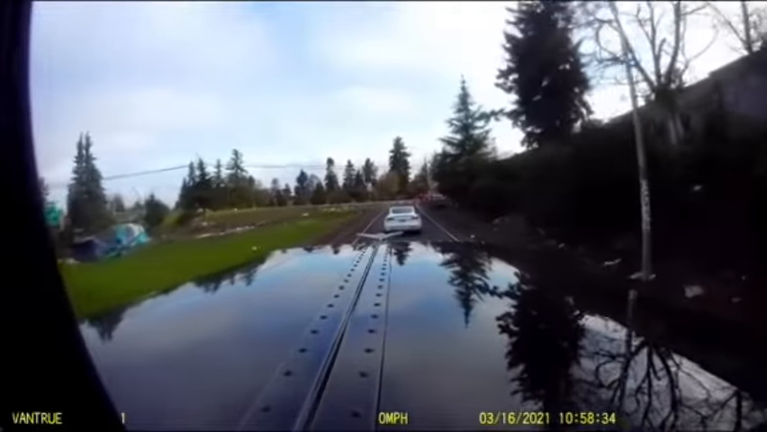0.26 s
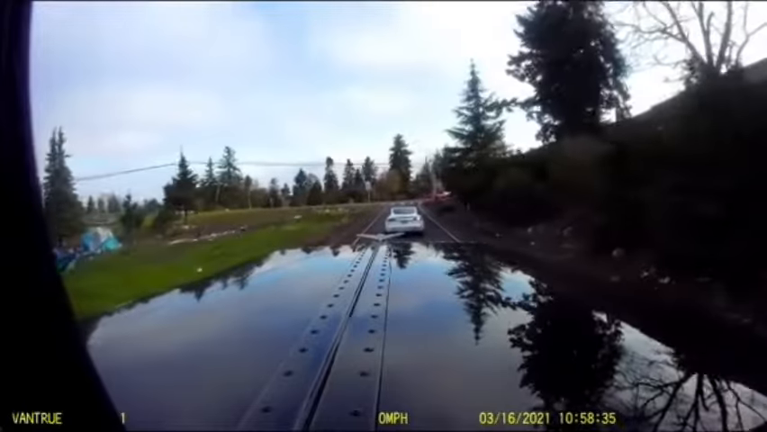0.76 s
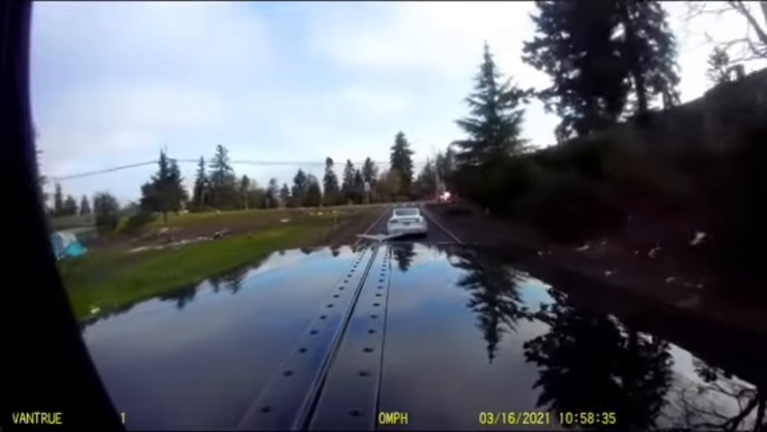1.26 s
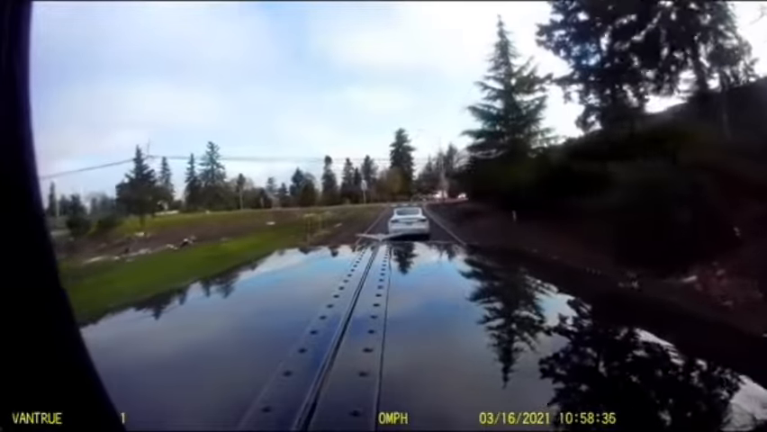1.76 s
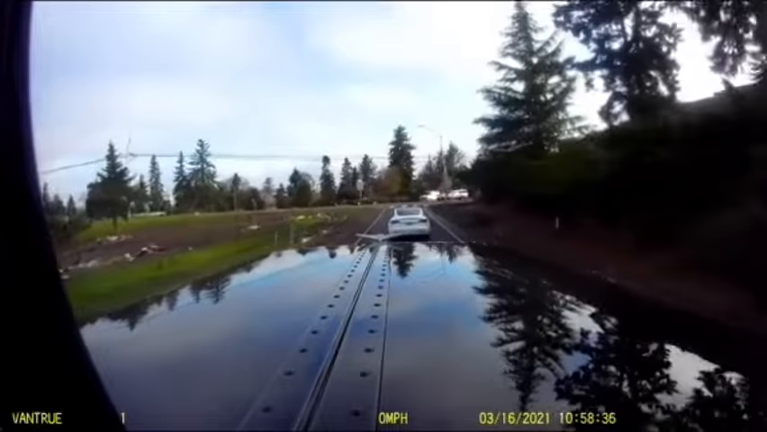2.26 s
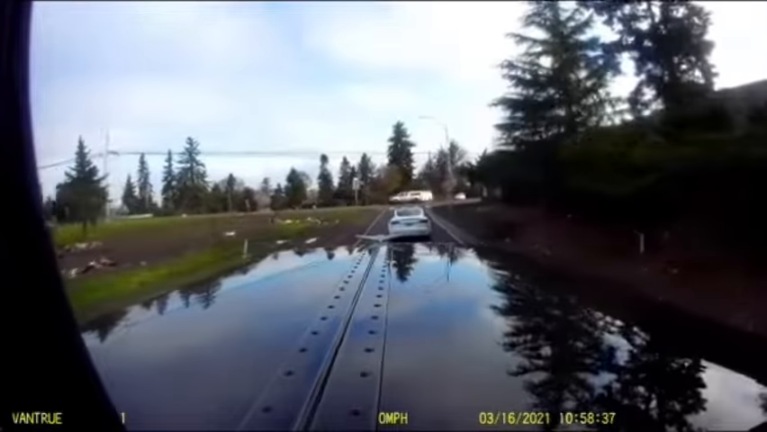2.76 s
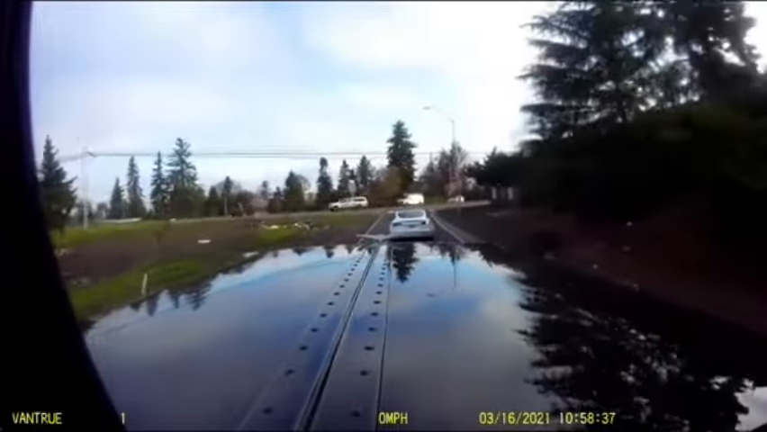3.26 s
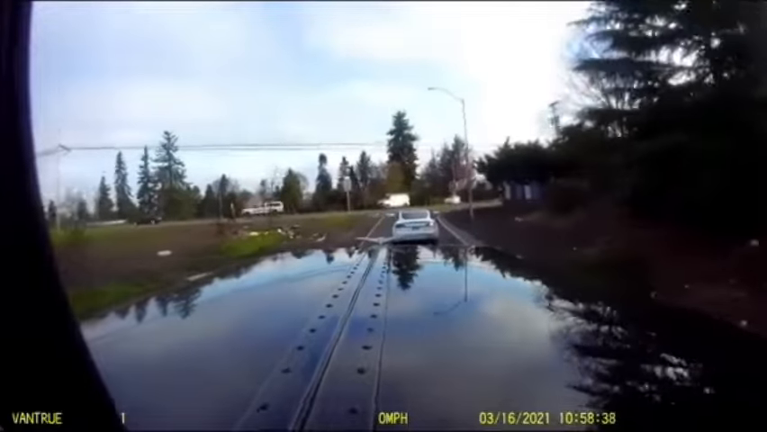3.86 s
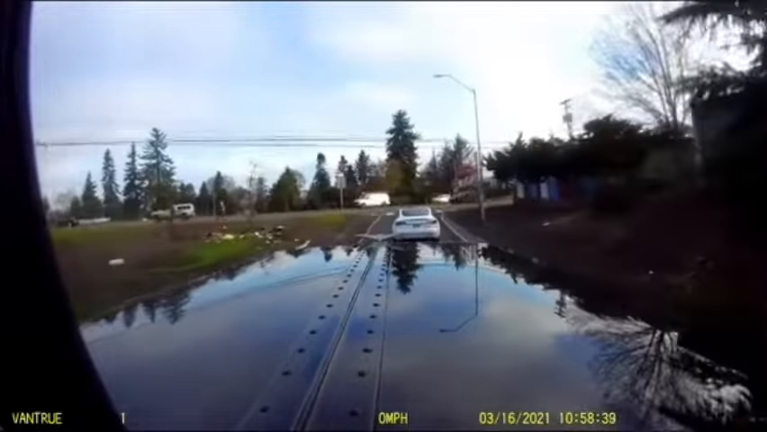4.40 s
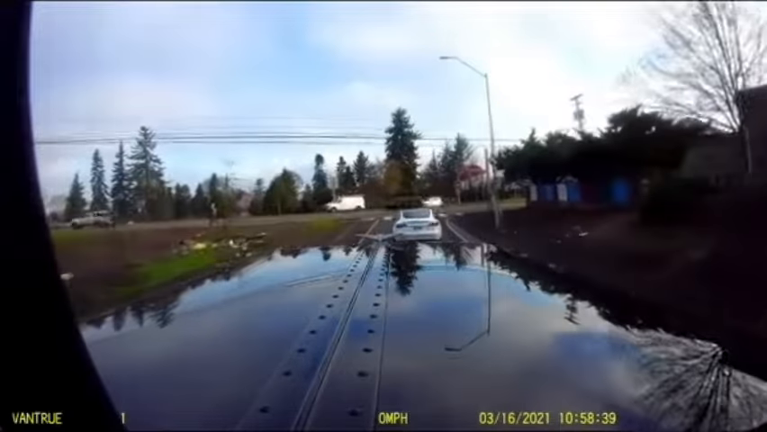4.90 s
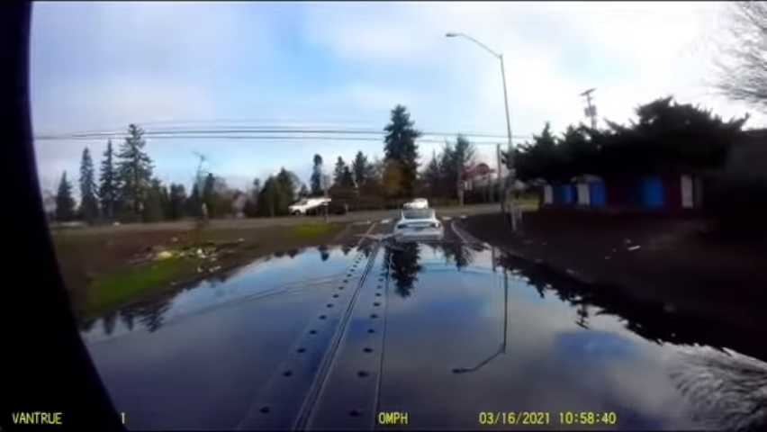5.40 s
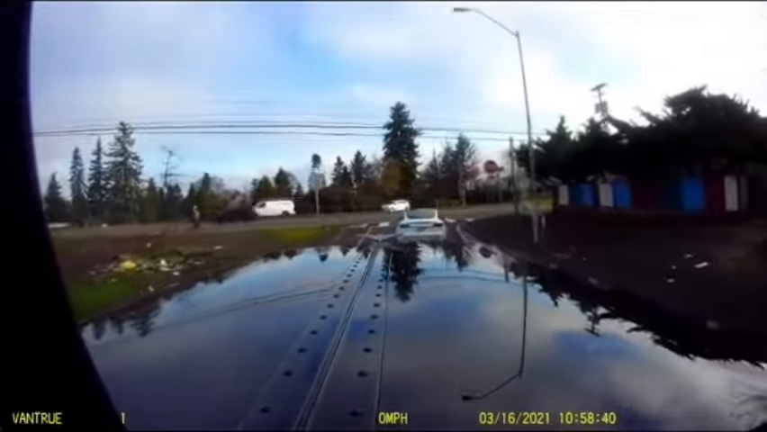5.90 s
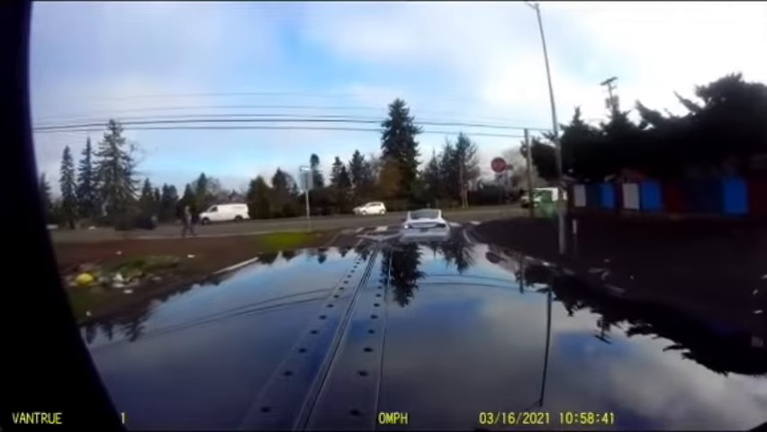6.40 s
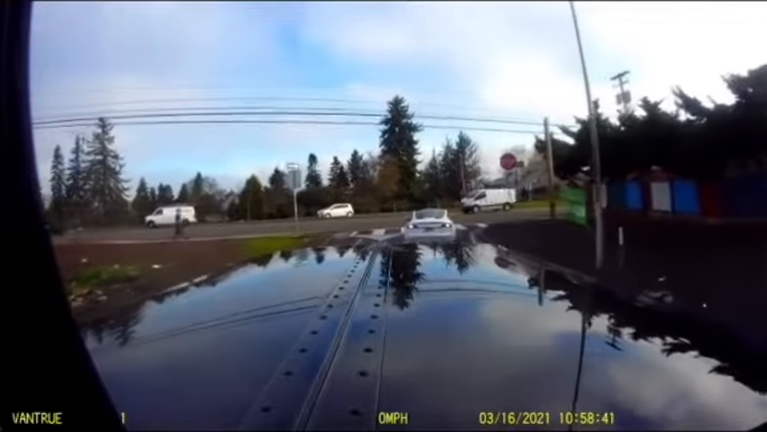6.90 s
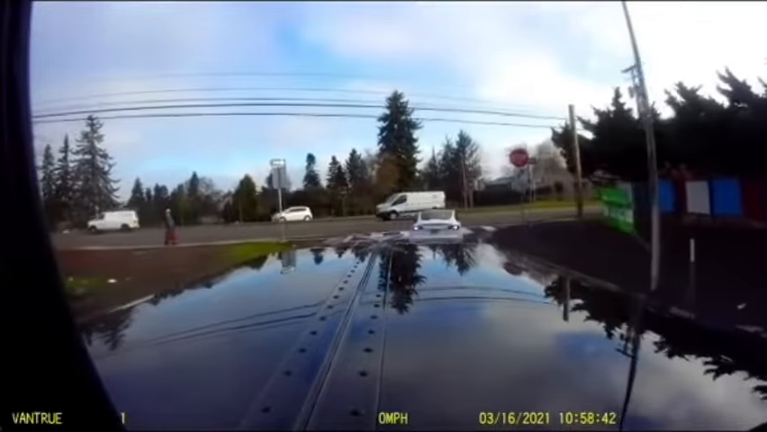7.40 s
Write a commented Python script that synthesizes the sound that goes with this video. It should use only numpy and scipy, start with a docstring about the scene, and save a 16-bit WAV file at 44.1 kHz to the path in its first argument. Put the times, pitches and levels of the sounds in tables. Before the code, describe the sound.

From the start, a heavy diesel truck's engine brake barks loudly in a fast, hammering rattle, heard from inside the cab. Its pitch sinks slowly while the level holds, with small irregular snaps, low road rumble and a faint air hiss. Around 3.5 seconds there is a click, and the cab swells into a low boom with a light buzz of trim. At about 3.8 seconds the brake cuts off. The engine note drops and a very faint turbo whistle falls until 4.6 seconds. The engine then idles much more quietly, with a low hum and a throbbing pump whine. From about 4.3 seconds a turn signal ticks close by, evenly, roughly every 0.4 seconds to the end. A small click comes at 5 seconds, a soft rustle at 5.6, a soft bump at 6, and a sharp click at about 7.6 seconds.

```python
"""A six-cylinder truck diesel braking on compression, heard from a microphone inside the cab.
Each cylinder dumps its air and barks through the stack as the speed sinks, over road noise and air hiss.
Near 3.8 s the brake releases; the cab booms and its trim buzzes as the firing rate passes its resonance,
the turbo spools down and the engine idles with a pump whine. Close by, the indicator relay ticks and
small things click and rustle. The loudest barks hit the input limiter."""
import sys
import numpy as np
from scipy.fft import rfft, irfft, next_fast_len
from scipy.io import wavfile
from scipy.ndimage import uniform_filter1d, minimum_filter1d, map_coordinates

SR = 44100
rng = np.random.default_rng(int(sys.argv[2]) if len(sys.argv) > 2 else 0)


def generate_wav(signal):
    """Clip the signal to [-1, 1] and save it as 16-bit WAV at the path in sys.argv[1]."""
    frames = np.transpose(np.atleast_2d(signal))
    scaled = np.clip(frames, -1, 1) * 32767
    pcm = np.round(scaled).astype(np.int16)
    wavfile.write(sys.argv[1], SR, pcm)


N = 337365
PRE_ROLL = SR // 4  # samples: the brake is already on, so the modes ring from the first moment
RELEASE_S, FUEL_ON_S, FUEL_RISE_S = 3.775, 4.58, .33  # brake off; injection returns near idle speed

# Engine speed as firings a second: t/s, f/Hz
FIRING_RATE = [(0, 61.25), (.2, 58.7), (.33, 57.64), (.5, 57.4), (.75, 57.02), (.95, 55.78), (1.2, 54.55),
               (1.4, 52.4), (1.55, 51.22), (1.75, 50.14), (1.9, 49.5), (2.1, 48.98), (2.4, 48.01),
               (2.7, 47.1), (2.95, 46.31), (3.2, 45.3), (3.45, 44.01), (3.75, 41.96), (3.95, 41.46),
               (4.25, 37.54), (4.63, 28.6), (4.9, 29.9), (7.65, 29.99)]
# Brake at the seat: t/s, bark level/dB, stack modes/dB, uneven cylinders/dB, stack's high ring/dB
BARK_LEVELS = [(0, -16, -1, -2, -1.5), (.3, -14, -5, -5, -5), (.6, -14, -2, -3.5, -3),
               (.9, -13.5, -6, -2.5, 0.8), (1.2, -13.5, -6, -16.5, 1.7), (1.5, -14, -5.5, -9, -2),
               (1.8, -13.5, -3, -13.5, -0.5), (2.1, -13.5, -10, -8, 0.5), (2.35, -15.5, 0.5, -2.5, -4.5),
               (2.6, -13, -1, -6.5, 3), (2.85, -14, 2.5, -8, -5.5), (3.1, -15.5, 1, -4.5, 2),
               (3.3, -14.5, -4, -6, -0.5), (3.55, -13, -6, -14.5, .1), (3.76, -12.5, -9.5, -2.5, -2)]
# Six cylinders in firing order: level/dB, extra run through the manifold/s
MANIFOLD_PATHS = [(0, .00057), (0, .0002), (0, -.00028), (0, .00073), (0, .00023), (0, -.0001)]
# The sharpest bark wanders between cylinders: t/s, then level/dB for each of the six
CYLINDER_LEVELS = [(0.13, -1.5, -5, -1.5, -8, 1, -2.5), (0.33, -0.5, 0.5, -0.5, 2, 2.5, 4.5),
                   (0.539, -9, -2, 2.5, -2.5, 0.5, 2), (0.749, -2.5, -3.0, 5, -2, 0, 3.5),
                   (0.96, 1, -4, 1.0, -2, 3, 0.5), (1.18, 0, 1.5, 0, 1, 0, 0.5),
                   (1.4, -5, -0.5, 0.5, -1.5, 4, 1.5), (1.641, -0.5, -7, 1.0, -2, -1.5, -1.0),
                   (1.881, 1, -4, 0.5, 4.5, -2.5, 1), (2.12, 3, -3.5, 2.5, 3.5, 1.5, 2.5),
                   (2.37, 0.5, -3, 6.5, -6.5, 3, 5.5), (2.62, 0, -5, -2.5, -2.5, -6.5, -2.5),
                   (2.88, 0.5, 2.5, -5, 0, 1.5, -6.5), (3.14, -10.5, -3, -8, -0.5, 4.5, -4),
                   (3.4, 2, 2, 0.5, 2.5, 1, -0.5), (3.68, 0.5, 1.5, -1.5, 4.5, 7.5, -0.5)]
# Cab modes rung by every bark: f/Hz, width/Hz, level/dB
CAB_MODES = [(103.4, 11.2, -3.5), (123.1, 4.3, -2), (160, 5.3, 1), (178.6, 12, -7), (227.7, 9.8, 2),
             (249.4, 25.5, -2.5), (292.3, 8.9, -8.5), (348.7, 15, -11), (388, 31, -13.5)]
# Modes of the exhaust stack outside: f/Hz, width/Hz, level/dB
STACK_MODES = [(412, 8.6, -7.5), (460, 8.5, -3), (509.3, 15, -3), (568, 3.2, -20.5), (598.7, 13, -2),
               (656.6, 17.3, -1.5), (736, 27, -8), (772.5, 5.1, -1.5), (864, 26.6, -6.5), (955, 21, -7.5),
               (1125, 42, -7.5)]
# Extra path from the cylinder pair nearest the cab: f/Hz, width/Hz, level/dB
NEAR_PAIR_MODES = [(82, 14, -21), (104, 3, -6), (122.8, 4.2, 0), (164.7, 7.7, -5), (221, 3.3, -1.5),
                   (252.4, 9, -1.5), (297, 5.1, -10), (361.5, 8.2, -10)]
# Where the cab passes little: f/Hz, half-width/Hz
CAB_DIPS = [(318, 22.4), (400, 16)]
# The cab's two middle bands: f/Hz, width/Hz
MID_BANDS = [(235, 22), (295, 22)]
# Their sway: t/s, lower band/dB, upper band/dB, cylinders uneven the other way round/dB
MID_LEVELS = [(0, 0, 7, -23), (.15, -1, -4, -16), (.3, -7, -3.5, -12), (.42, -12, 0.5, -12),
              (.5, -7, 2, -11), (.56, 0, 1.5, -14), (.8, -2.5, 1, -12.5), (1.1, 0, -0.5, -11.5),
              (1.4, 0.5, -2.5, -20), (1.7, 2, 0, -22), (2, 0.5, 5.5, -12), (2.4, 6, -8, -8.5),
              (2.5, 0, -4, -9), (2.75, -3, 1, -14), (3, 1.5, 2, -7), (3.25, -2.5, -2, -20),
              (3.4, 0, -6.5, -24), (3.55, -2, 11.5, -20), (3.76, -2, 6.5, -16)]
# The cab's deep and boxy bands: f/Hz, width/Hz
FLANK_BANDS = [(165, 25), (355, 22)]
# Their sway: t/s, deep band/dB, boxy band/dB
FLANK_LEVELS = [(0, -0.5, 1), (.25, 1, -1), (.5, 0.5, 2.5), (.8, -1.5, 3), (1.1, -1, 0.5), (1.35, 0, 2),
                (1.6, 0, 2.5), (1.9, 2.5, 0.5), (2.2, -1, -2), (2.5, 1, -2), (2.8, -2.5, -1),
                (3.1, 1, -0.5), (3.3, 2, 2), (3.55, -1.5, 2.5), (3.76, -0.5, 2)]
# The cab's answer to the firing rate: f/Hz, level/dB
BOOM_RESPONSE = [(31, -42), (36.8, -32), (38.7, -19.5), (41.7, -14), (42.8, -17), (43.8, -33), (47, -50.5),
                 (57, -26)]
# Faint tones under braking load: f/Hz, level/dB, phase unrest/rad
LOAD_TONES = [(3830, -66, 1), (4300, -68, 2.4)]
# Spectrum of road and engine noise: f/Hz, level/dB
FLOOR_SPECTRUM = [(35, -37), (60, -4.5), (85, -14.5), (102, -6), (123, -1), (327, -10.5), (351, -8.5),
                  (385, -11), (688, -13), (829, -17.5), (1100, -25), (1670, -36), (2530, -42),
                  (3190, -44.5), (15500, -64.5)]
# Dashboard and housing resonances: f/Hz, width/Hz, level/dB
DASH_MODES = [(894, 53, 2), (1930, 264, 9), (3124, 170, 5.5)]
# Noise from underfoot: t/s, thrum/dB, clatter/dB
FLOOR_LEVELS = [(0, -19.5, -27), (.75, -20.5, -24.5), (1.5, -22.5, -27.5), (2.2, -27, -28),
                (2.9, -14.5, -19), (3.25, -22, -24.5), (3.7, -20.5, -20), (4, -26.5, -28), (4.5, -28, -28),
                (7.65, -28.5, -29)]
# Road rumble: t/s, level/dB
RUMBLE_LEVELS = [(0, -33), (1.7, -28.5), (2.6, -37), (3.6, -31), (4.6, -30.5), (7.65, -30)]
# Spectrum of the air hiss: f/Hz, level/dB
HISS_SPECTRUM = [(1410, -19.5), (2400, -23), (3550, -2), (3830, -2), (4050, -3.5), (5530, -7.5),
                 (8240, -19.5), (9550, -15.5), (15500, -54)]
# Swells of the air hiss: t/s, level/dB
HISS_SWELLS = [(0.03, -53.5), (0.3, -67), (0.77, -57.5), (1.21, -57.5), (1.38, -60), (2.23, -58.5),
               (2.86, -51), (3.26, -57), (3.43, -53), (3.62, -52), (3.73, -54.5), (3.92, -57.5),
               (4.4, -67.5), (5.9, -61), (6.6, -67), (7.62, -61)]
# Snaps among the barks: t/s, peak/dB, relative treble/dB
BARK_CRACKS = [(0.0677, -21, -14), (0.0992, -30, -14), (0.1685, -24, -15), (0.375, -21, -12),
               (0.426, -23, -11.5), (0.4768, -17, -13), (0.5862, -19.5, -19), (0.6862, -14, -10.5),
               (0.7434, -17.5, -19), (0.7913, -15.5, -16), (1.0056, -23, -13.5), (1.0595, -22.5, -18),
               (1.1139, -29, -12), (1.168, -28, -14), (1.2242, -18.5, -14), (1.3354, -19.5, -11),
               (1.4511, -22, -18), (1.785, -18.5, -17), (1.844, -27, -14), (1.9242, -19, -14),
               (1.9666, -23.5, -16), (2.027, -24.5, -18), (2.1495, -27, -16), (2.2727, -20.5, -20),
               (2.3354, -21, -18), (2.357, -21, -16), (2.3974, -21, -21), (2.523, -22.5, -16),
               (2.8394, -25, -17), (2.8637, -31, -13), (2.9053, -17, -13), (2.9257, -23, -16),
               (2.9684, -26, -9), (2.9918, -18, -13), (3.0237, -25, -14), (3.0387, -18, -15),
               (3.057, -11.5, -17.5), (3.122, -19, -12), (3.167, -18, -14), (3.1872, -14.5, -21),
               (3.2527, -17.5, -19), (3.321, -19.5, -16), (3.4535, -21, -12), (3.5423, -28, -13),
               (3.5663, -20, -12), (3.5945, -16, -15), (3.617, -24, -12), (3.6653, -19.5, -16),
               (3.7357, -17, -17)]
# Clicks close by, the first three being early ticks of the indicator relay: t/s, peak/dB, f/Hz, width/octaves,
# 60 dB decay/s
CAB_CLICKS = [(3.456, -19, 4120, 0.81, 0.018), (3.865, -25.5, 2920, 0.72, 0.036),
              (3.885, -28.5, 3020, 0.57, 0.086), (4.948, -31, 4340, 0.45, .06),
              (4.9563, -22.5, 5200, 0.27, 0.015), (4.957, -22.5, 2950, 0.6, 0.12),
              (4.9566, -26.5, 8530, 0.55, 0.11), (5.933, -41, 5600, 0.65, 0.024),
              (6.179, -41, 2950, 0.89, .03), (7.408, -29, 2950, 0.74, 0.01), (7.559, -35, 2600, 1, 0.011),
              (7.5765, -13.5, 2100, 0.38, 0.01), (7.5763, -12.5, 4380, 0.26, 0.011),
              (7.5777, -17, 7600, 0.26, 0.011), (7.58, -33, 6540, 0.78, 0.14),
              (7.585, -33, 3000, 0.86, .012)]
# Turbo spooling down: t/s, f/Hz, level/dB
TURBO_GLIDE = [(3.85, 5650, -78), (3.95, 5480, -61), (4.12, 5030, -62), (4.2, 4800, -66), (4.45, 4250, -63),
               (4.55, 4130, -63), (4.65, 4050, -80)]
# Relay closing, then opening: peak/dB, chatter/s
RELAY_STROKES = [(-31.5, 0.03), (-32, 0.035)]
# Relay housing: f/Hz, width/Hz, level/dB
RELAY_MODES = [(1798, 85, 3), (2877, 106, 1), (3260, 60, -3.5), (3745, 56, -2), (4660, 200, -13.5)]
# Harmonics at idle: multiple of the firing rate, level/dB
IDLE_ORDERS = [(1.5, -49.5), (2, -38.5), (4, -34), (5, -50), (6, -63), (7, -45.5), (12, -37.5)]
# Soft bumps and rustles close by: centre t/s, top rms level/dB, f/Hz, width/octaves, spread/s
CAB_RUSTLES = [(5.565, -60, 8060, 0.7, 0.057), (5.618, -32, 890, 0.67, 0.024),
               (6.017, -26.5, 247, 0.57, 0.018), (6.02, -21, 665, 0.42, 0.016),
               (6.024, -34, 1700, 0.73, 0.014), (7.452, -50, 5840, 0.55, 0.024)]


def amp(db):
    return 10 ** (np.asarray(db) / 20)


def unit_rms(x):
    return x / np.sqrt(np.mean(x ** 2) + 1e-20)


def curves(rows):
    """One value per sample for each column after the time."""
    times, *columns = np.transpose(rows)
    return [np.interp(np.arange(N) / SR, times, column) for column in columns]


def ramp(start_s, length_s):
    """A straight rise from 0 to 1."""
    return np.clip((np.arange(N) / SR - start_s) / length_s, 0, 1)


def wobble(rate):
    """A smooth random curve, rate knots a second."""
    return map_coordinates(rng.standard_normal(int(N * rate / SR) + 4), [np.arange(N) * rate / SR])


def filtered(x, gain):
    """x through the minimum-phase filter whose size at each frequency is gain(Hz)."""
    size = 2 * next_fast_len(len(x) // 2 + SR // 4)
    cepstrum = irfft(np.log(gain(np.fft.rfftfreq(size, 1 / SR)) + 1e-7), size)
    cepstrum[1:size // 2] *= 2
    cepstrum[size // 2 + 1:] = 0
    return irfft(rfft(x, size) * np.exp(rfft(cepstrum)), size)[:len(x)]


def modes(rows):
    """Gain of a set of resonances."""
    return lambda f: np.sqrt(sum(amp(2 * db) / (1 + ((f - hz * hz / (f + 1)) / width) ** 2)
                                 for hz, width, db in rows))


def spectrum(points):
    """Gain through (Hz, dB) points on a log axis."""
    hz, db = np.transpose(points)
    return lambda f: amp(np.interp(np.log(f + 1), np.log(hz + 1), db))


def hump(hz, octaves):
    """Gain of a bell-shaped band."""
    return lambda f: np.exp(-.5 * (np.log2((f + 1) / hz) / octaves) ** 2)


def noise(gain, length=N):
    return unit_rms(filtered(rng.standard_normal(length), gain))


def swayed(x, hz, width, db):
    """x with one band raised or lowered over time."""
    band = irfft(rfft(x) * np.exp(-.5 * ((np.fft.rfftfreq(N, 1 / SR) - hz) / width) ** 2), N)
    return x + (amp(db) - 1) * band


def place(track, start_s, sound, peak_db):
    """Add a short sound at a given peak level."""
    span = track[round(start_s * SR):][:len(sound)]
    span += amp(peak_db) * sound[:len(span)] / np.abs(sound).max()


def firings():
    """Running count of firings at each sample."""
    return np.cumsum(curves(FIRING_RATE)[0]) / SR + 1.048


def heard_in_cab(drive, resonances):
    """Ring the resonances and carry them to the microphone through walls that shut out the treble."""
    def gain(f):
        walls = 1 / (1 + (f / 1010) ** 24) / (1 + (75 / (f + 1)) ** 6)
        notch = 1 - 1 / (1 + ((f - 234.3) / 3.25) ** 2)  # stack and floor paths cancel
        dips = np.prod([1 - .77 / (1 + ((f - hz) / width) ** 2) for hz, width in CAB_DIPS], axis=0)
        return modes(resonances)(f) * walls * notch * dips
    return unit_rms(filtered(drive, gain)[PRE_ROLL:PRE_ROLL + N])


def frame_thumps(dumps, cylinder, sizes, puffs, uneven_db, lead_s=.0012, push_s=.00041):
    """Each dump pushes through the frame, ahead of the air path, and rings the cab's low modes."""
    even, pair, skew = np.zeros((3, len(puffs) + SR))
    arrivals = dumps - round(lead_s * SR)
    even[arrivals] = sizes
    pair[arrivals] = sizes * np.array([-.5, -.5, 1])[cylinder % 3]  # repeats every turn of the crank
    skew[arrivals] = sizes * np.array([1, -1, 0])[cylinder % 3]  # one dumps late, the next early
    skew = np.gradient(skew) * SR / (2 * np.pi * 227)  # timing weighs as much as size at 227 Hz
    push = np.exp(-.5 * (np.arange(-100, 101) / SR / push_s) ** 2)
    even, uneven, reverse = (np.convolve(x, push, 'same') for x in (even, pair - skew, pair + skew))
    thumps = heard_in_cab(even, CAB_MODES) + amp(uneven_db) * heard_in_cab(uneven, NEAR_PAIR_MODES)
    thumps += amp(-17) * heard_in_cab(puffs, NEAR_PAIR_MODES)
    *mid_db, reverse_db = curves(MID_LEVELS)
    for band, db in zip(MID_BANDS, mid_db):
        thumps = swayed(thumps, *band, db)
    thumps += amp(reverse_db) * heard_in_cab(reverse, NEAR_PAIR_MODES)
    for band, db in zip(FLANK_BANDS, curves(FLANK_LEVELS)):
        thumps = swayed(thumps, *band, db)
    return thumps


def stack_barks(dumps, cylinder, sizes, puffs, scatter_s, echo_s=.0046):
    """Sharp pressure fronts ring the stack; a manifold reflection doubles every third one."""
    dump_s = (dumps - PRE_ROLL) / SR
    rate = np.interp(dump_s, *np.transpose(FIRING_RATE))
    path_db, path_s = np.transpose(MANIFOLD_PATHS)[:, cylinder]
    advance_s = .000055 * np.maximum(rate - 47, 0) * (cylinder % 3 != 1)  # four dump earlier at speed
    delay_s = path_s + scatter_s - advance_s
    times, *levels = np.transpose(CYLINDER_LEVELS)
    wander_db = np.choose(cylinder, [np.interp(dump_s, times, db) for db in levels])
    heights = -sizes * amp(path_db + wander_db)
    echo_gain = amp(-4 - .53 * np.maximum(60 - rate, 0)) * (cylinder % 3 == 2)  # fades as speed sinks
    fronts = np.zeros(len(puffs) + SR)
    fronts[dumps + np.round(delay_s * SR).astype(int)] = heights
    fronts[dumps + np.round((delay_s + echo_s) * SR).astype(int)] = heights * echo_gain
    return heard_in_cab(fronts, STACK_MODES) + amp(-14) * heard_in_cab(puffs, STACK_MODES)


def compression_brake(release_fade_s=.0048):
    """Each cylinder dumps its air at the top of the stroke: one pulse a firing, into frame and stack."""
    bark_db, stack_db, uneven_db, ring_db = curves(BARK_LEVELS)
    run_up = firings()[0] - FIRING_RATE[0][1] * np.arange(PRE_ROLL, 0, -1) / SR
    count = np.r_[run_up, firings()]
    dumps = np.flatnonzero(np.diff(np.floor(count))) + 1
    cylinder = np.floor(count[dumps]).astype(int) % 6
    size_draw, valve_draw = rng.standard_normal((len(dumps), 2)).T
    sizes = amp(.6 * size_draw)
    puffs = np.exp(-3 * (count % 1)) * rng.standard_normal(len(count))  # turbulence after each dump
    thumps = frame_thumps(dumps, cylinder, sizes, puffs, uneven_db)
    barks = stack_barks(dumps, cylinder, sizes, puffs, scatter_s=.00008 * np.abs(valve_draw))
    barks = swayed(barks, hz=870, width=110, db=ring_db)
    release = np.exp(-np.maximum(np.arange(N) / SR - RELEASE_S, 0) / release_fade_s)
    return amp(bark_db) * release * (thumps + amp(stack_db) * barks)


def cab_boom():
    """The first firing order swells around the microphone as it passes the cab's resonance."""
    response_db = np.interp(curves(FIRING_RATE)[0], *np.transpose(BOOM_RESPONSE))
    resonance = amp(response_db + .8 * wobble(3.5))
    idle = ramp(FUEL_ON_S, FUEL_RISE_S) * amp(-31.5 + 2.9 * wobble(3))
    return (resonance + idle) * np.sin(2 * np.pi * firings())


def load_whistles():
    """Faint wavering tones that last until the brake lets go."""
    t = np.arange(N) / SR
    tones = sum(amp(db + 3 * wobble(12)) * np.sin(2 * np.pi * hz * t + unrest * wobble(90))
                for hz, db, unrest in LOAD_TONES)
    return tones * (1 - ramp(RELEASE_S, .1))


def floor_noise(split_hz=1050):
    """Road and engine noise from underfoot, coloured by the dashboard: low thrum, clatter above it."""
    throb = 1 + .098 * np.cos(2 * np.pi * firings())
    drive = throb * rng.standard_normal(N)
    body = filtered(drive, lambda f: spectrum(FLOOR_SPECTRUM)(f) * (1 + modes(DASH_MODES)(f)))
    body = unit_rms(body) * amp(.68 * wobble(9.7))
    thrum = irfft(rfft(body) / (1 + (np.fft.rfftfreq(N, 1 / SR) / split_hz) ** 8), N)
    thrum_db, clatter_db = curves(FLOOR_LEVELS)
    return amp(thrum_db) * thrum + amp(clatter_db) * (body - thrum)


def road_rumble():
    """Deep noise from the road below the cab."""
    return noise(hump(hz=33, octaves=.73)) * amp(curves(RUMBLE_LEVELS)[0] + 1.1 * wobble(3.9))


def air_hiss():
    """Air hisses and flickers, strongest late in the braking."""
    return noise(spectrum(HISS_SPECTRUM)) * amp(curves(HISS_SWELLS)[0] + 2.5 * wobble(25))


def bark_cracks(width_s=.00023):
    """Brief broadband snaps on top of the barking."""
    track, t = np.zeros(N), np.arange(600) / SR
    body, treble = hump(hz=1850, octaves=.6), hump(hz=3800, octaves=.5)
    for s, db, treble_db in BARK_CRACKS:
        pulse = (1 + .2 * rng.standard_normal(len(t))) * np.exp(-.5 * ((t - .001) / width_s) ** 2)
        snap = filtered(pulse, lambda f: body(f) + amp(treble_db) * treble(f))
        place(track, s - 20 / SR, snap, db)
    return track


def cab_clicks(attack_s=.00045):
    """Clicks near the microphone, each a fast-dying burst of noise; the first ones are early ticks of the
    relay."""
    track, t = np.zeros(N), np.arange(SR // 4) / SR
    for s, db, hz, octaves, t60 in CAB_CLICKS:
        burst = rng.standard_normal(len(t)) * amp(-60 * t / t60) * np.minimum(t / attack_s, 1)
        click = filtered(burst, lambda f: hump(hz, octaves)(f) / (1 + (f / 14000) ** 8))
        place(track, s, click, db)
    return track


def trim_buzz():
    """Cab trim taps twice a firing during the boom."""
    taps = np.exp(-4.5 * (2 * firings() % 1)) * amp(1.5 * wobble(110)) * rng.standard_normal(N)
    buzz = filtered(taps, lambda f: hump(hz=4300, octaves=.5)(f) / (1 + (f / 5050) ** 16))
    return amp(-46.5) * unit_rms(buzz) * ramp(3.458, .005) * (1 - ramp(3.86, .04))


def pump_whine(order=27.35):
    """A belt-driven pump throbs with the firings: briefly after the release, then louder at idle."""
    phase = 2 * np.pi * firings()
    coasting = amp(-43.5) * ramp(RELEASE_S, .16) * (1 - ramp(4.1, .12))
    idling = amp(-32.5) * ramp(4.45, .25)
    throb = amp(2.3 * wobble(16)) * (1 + .6 * np.cos(phase))
    return (coasting + idling) * throb * np.sin(order * phase + .9 * wobble(30))


def turbo_whistle():
    """The turbo's whistle falls as it spools down; a second blade row sings lower in pitch."""
    hz, db = curves(TURBO_GLIDE)
    phase = 2 * np.pi * np.cumsum(hz) / SR
    return sum(amp(db + row_db + 4 * wobble(30)) * np.sin(ratio * phase + 1.8 * wobble(200))
               for ratio, row_db in ((1, 0), (.58, 3)))


def engine_idle():
    """Slightly unsteady firing orders come in as injection returns."""
    phase = 2 * np.pi * firings()
    hum = sum(amp(db + 1.4 * wobble(6.4)) * np.sin(order * phase + 1.08 * wobble(5.3))
              for order, db in IDLE_ORDERS)
    return ramp(FUEL_ON_S, FUEL_RISE_S) * hum


def indicator_relay(start_s=4.2556, period_s=.7998, on_s=.4195):
    """Close by, contacts chatter as they close and open, ringing the relay's housing."""
    track, t = np.zeros(N), np.arange(SR // 4) / SR
    bounce = amp(.85 * np.cos(2 * np.pi * t / .016))
    for stroke in range(9):
        blink, opening = divmod(stroke, 2)
        db, chatter_s = RELAY_STROKES[opening]
        envelope = np.exp(-(t / chatter_s) ** 3) * np.minimum(t / .0023, 1)
        chatter = rng.standard_normal(len(t)) * envelope * bounce
        tick = filtered(chatter, lambda f: modes(RELAY_MODES)(f) / (1 + (f / 5500) ** 4))
        place(track, start_s + blink * period_s + opening * on_s - 200 / SR, tick, db)
    return track


def cab_rustles():
    """Soft bumps and rustles in the cab, each a short swell of noise."""
    track, t = np.zeros(N + SR), np.arange(SR // 4) / SR
    for s, db, hz, octaves, spread_s in CAB_RUSTLES:
        swell = np.exp(-.5 * ((t - t[-1] / 2) / spread_s) ** 2)
        track[round(s * SR) - len(t) // 2:][:len(t)] += amp(db) * swell * noise(hump(hz, octaves), len(t))
    return track[:N]


def scene():
    """All sources summed at one microphone in the cab."""
    braking = compression_brake() + cab_boom() + load_whistles() + bark_cracks()
    bed = floor_noise() + road_rumble() + air_hiss()
    settling = pump_whine() + turbo_whistle() + engine_idle()
    close_by = cab_clicks() + trim_buzz() + indicator_relay() + cab_rustles()
    return (braking + bed + settling + close_by)[None]


def record(dry):
    """Behind the microphone, a fast limiter holds down the tallest peaks and a low-pass cuts the top."""
    ceiling, reaction_s, top_hz = .995, .0015, 15800
    span = round(reaction_s * SR)
    gain = minimum_filter1d(ceiling / np.maximum(np.abs(dry), ceiling), size=2 * span + 1)
    limited = dry * uniform_filter1d(uniform_filter1d(gain, size=span), size=span)
    size = next_fast_len(N + SR // 4)
    return irfft(rfft(limited, size) * (np.fft.rfftfreq(size, 1 / SR) < top_hz), size)[:, :N]


dry = scene()
out = record(dry)
generate_wav(out)
```